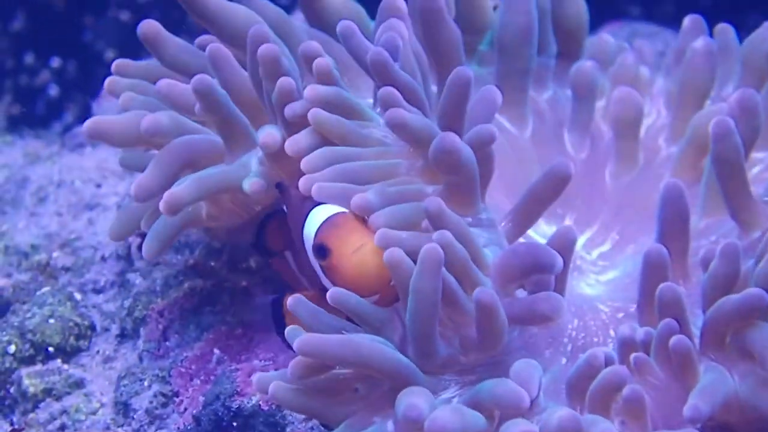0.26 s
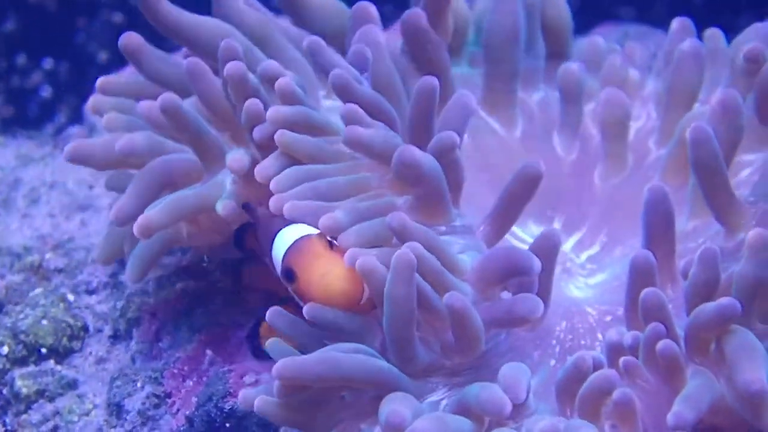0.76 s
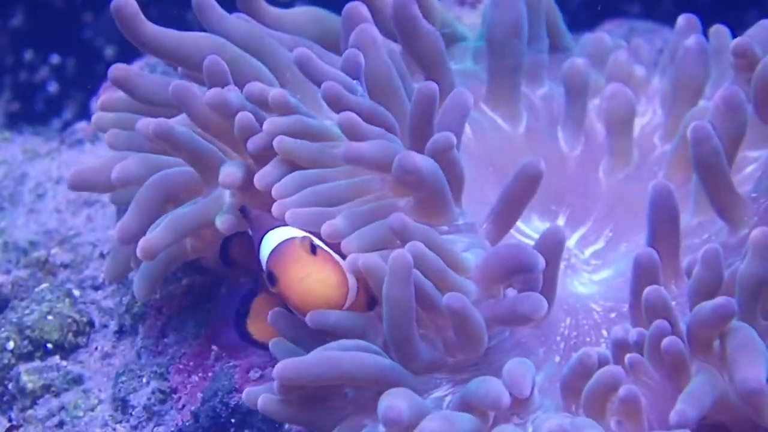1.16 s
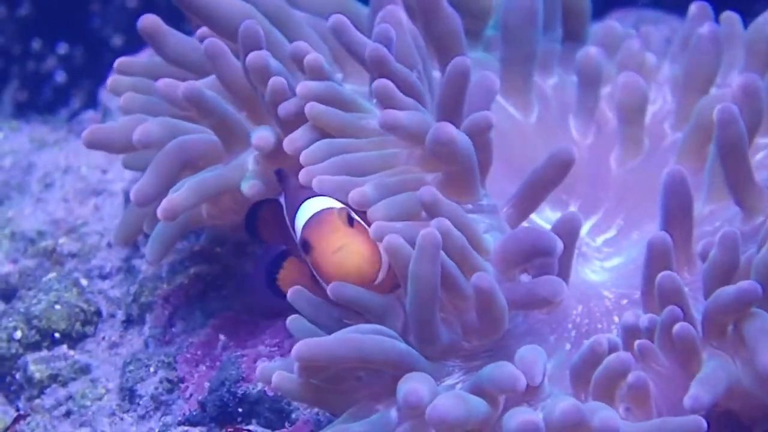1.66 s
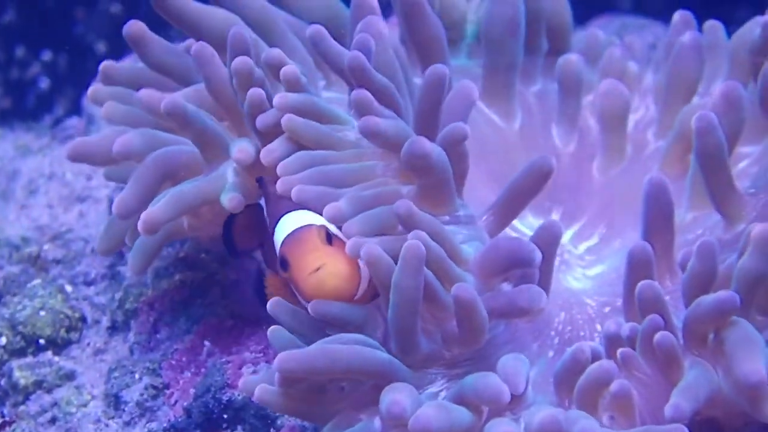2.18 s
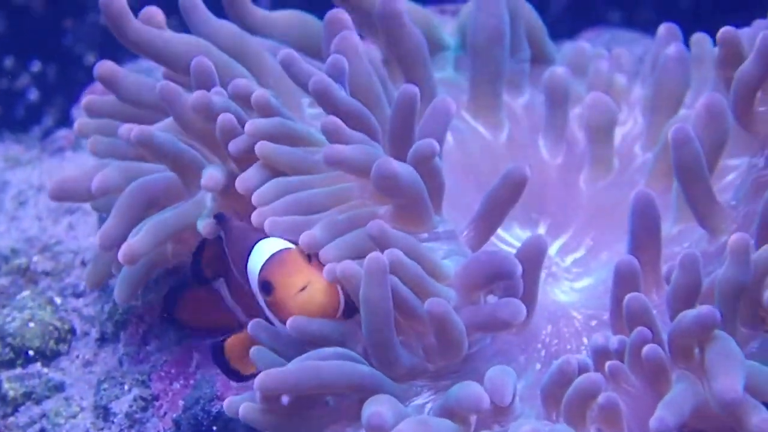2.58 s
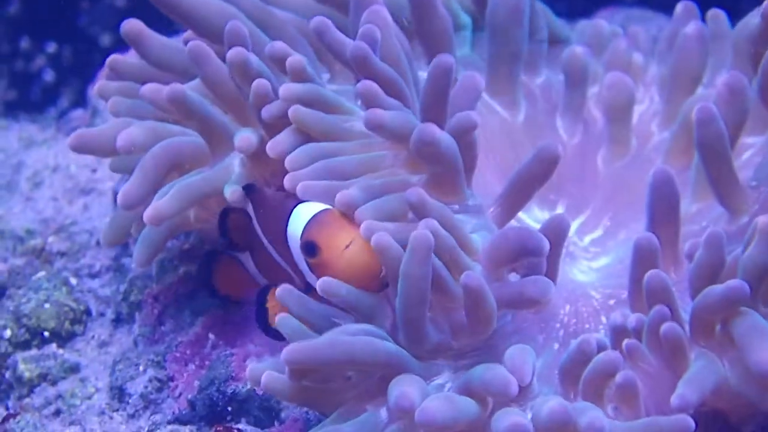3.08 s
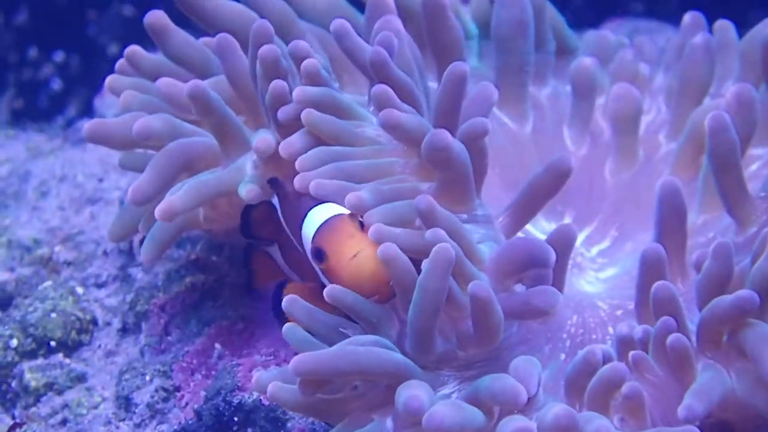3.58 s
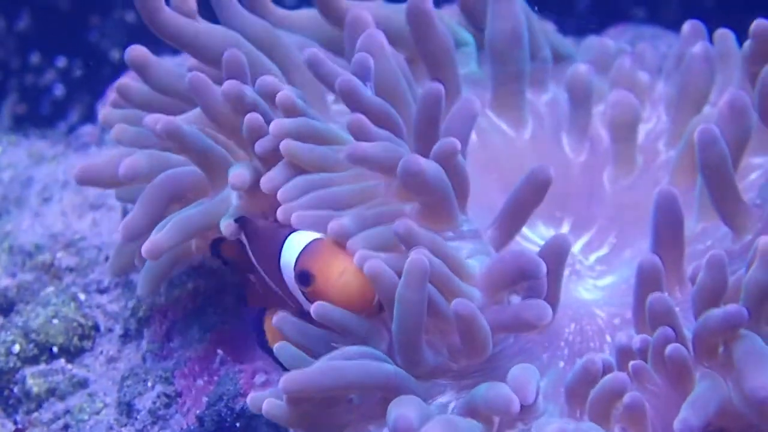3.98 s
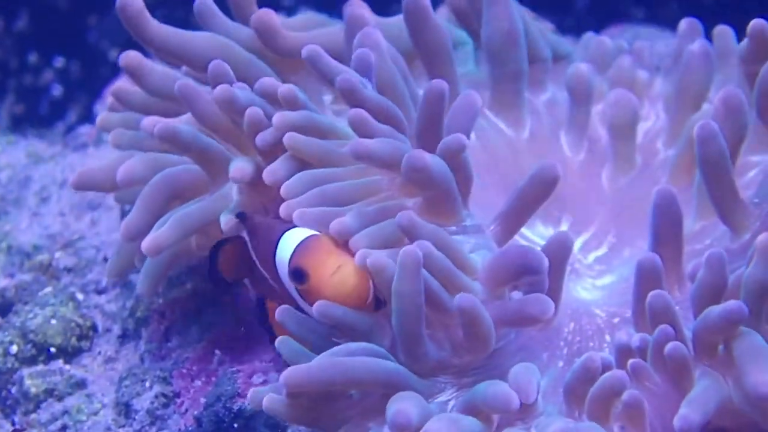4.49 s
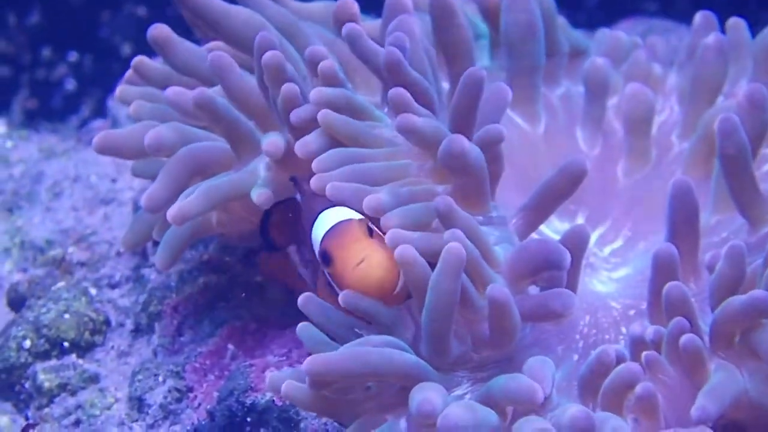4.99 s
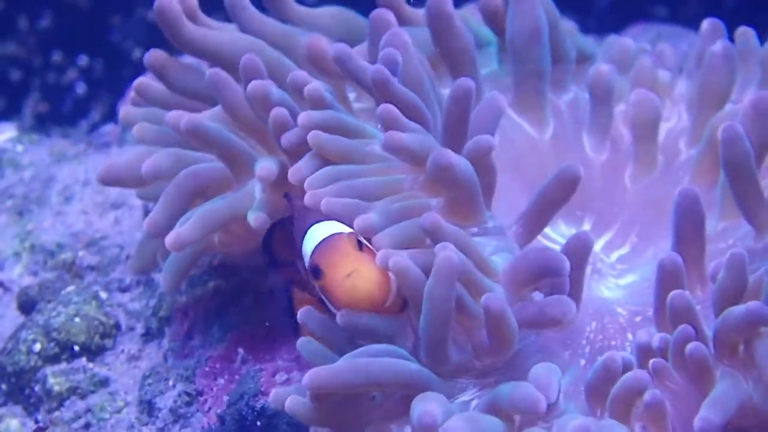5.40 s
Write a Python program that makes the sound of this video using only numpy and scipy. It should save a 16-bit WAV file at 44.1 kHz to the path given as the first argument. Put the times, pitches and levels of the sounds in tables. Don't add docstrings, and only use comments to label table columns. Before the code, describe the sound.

A fish tank heard close through a hand-held camera, with soft hiss. A low pump hum near 120 hertz starts close to full strength, glides down, and swells again around 2 and 4 seconds, each peak bringing muffled churning and short rising groans. Between them, from about 0.6, 2.2 and 3.7 seconds, a nearer pump spurts and hums more faintly. A steady filter purr, low rumble and water trickle run throughout; small bubbles blip and droplets tick. Until about 1.5 seconds the lens motor taps rapidly, some fifteen dull clicks a second, with a faint whine. Skin rubs and knocks, mostly on the left, cluster around 1.3 to 1.75, ending in a hard thump at 1.8. The middle is calmer, with a small snap at 2.8. The hum nearly vanishes at 4.2; a knock lands at 4.45, then rustling and bumps from 4.9 build to another hard thump at 5.6.

```python
import sys
import numpy as np
from scipy import signal
from scipy.fft import rfft, irfft, next_fast_len
from scipy.io import wavfile
from scipy.ndimage import uniform_filter1d

SR = 44100
rng = np.random.default_rng(int(sys.argv[2]) if len(sys.argv) > 2 else 0)


def unload_audio(sound):
    columns = np.transpose(np.atleast_2d(sound))
    steps = np.round(np.clip(columns, -1, 1) * 32767)
    wavfile.write(sys.argv[1], SR, steps.astype(np.int16))


def elevation(decibels):
    levels = np.asarray(decibels, float)
    return 10 ** (levels / 20)


N = 249165
EDGE = 4096
FULL = next_fast_len(N + 2 * EDGE)
TIME_S = np.arange(N) / SR
BIN_HZ = np.maximum(np.fft.rfftfreq(FULL, 1 / SR), 1)

# (time at full speed [s], hum level [dB], jet level [dB], churn level [dB])
FAR_SURGES = [
    (0.06, -35.5, -64.5, -41.5),
    (2.065, -34, -66, -30.5),
    (4.046, -34, -64.5, -33),
]
# (switch-on time [s], hum level [dB], jet level [dB])
NEAR_SURGES = [
    (0.6, -44.5, -55),
    (2.17, -43, -59.5),
    (3.741, -42, -56),
]
NEAR_PUSH_S = 0.793


def level(x, db):
    return x * elevation(db) / np.sqrt(np.mean(x ** 2))


def sides(pan_db):
    gain = elevation(np.array([pan_db, -pan_db]) / 2).reshape(2, -1)
    return gain / gain.mean(axis=0)


def on_log(table, hz):
    return np.interp(np.log(hz), np.log([r[0] for r in table]), [r[1] for r in table])


def peaks(table):
    power = 0
    for hz, width_hz, db in table:
        detune = (BIN_HZ - hz ** 2 / BIN_HZ) / width_hz
        power = power + elevation(2 * db) / (1 + detune ** 2) ** 2
    return np.sqrt(power)


def colour(x, gain):
    taper = signal.windows.tukey(N + 2 * EDGE, 2 * EDGE / (N + 2 * EDGE))
    longer = np.pad(x, [(0, 0), (EDGE, EDGE)], mode="reflect", reflect_type="odd") * taper
    return irfft(rfft(longer, FULL) * gain, FULL)[:, EDGE:EDGE + N]


def flicker(spread_db, rate_hz):
    step = 32
    k = int(SR / rate_hz / step)
    held = np.repeat(rng.standard_normal(N // step // k + 2), k)
    walk = 1.48 * uniform_filter1d(uniform_filter1d(held, k), k)
    return np.interp(np.arange(N), step * np.arange(len(walk)), elevation(spread_db * walk))


def swell(spans, fade_s, column=1):
    out = np.zeros(N)
    for span in spans:
        s, db = np.transpose(span)[[0, column]]
        to_end_s = np.minimum(TIME_S - s[0], s[-1] - TIME_S)
        out += elevation(np.interp(TIME_S, s, db)) * np.clip(to_end_s / fade_s + .5, 0, 1)
    return out


def glide(spans, multiples, wobble_db, fade_s):
    out = np.zeros(N)
    for span in spans:
        gain = np.sqrt(2) * swell([span], fade_s, column=2)
        on = gain > 0
        turn = 2 * np.pi * np.cumsum(np.interp(TIME_S[on], *np.transpose(span)[:2])) / SR
        for k, db in multiples:
            tone = np.sin(k * turn + 7 * rng.random())
            out[on] += gain[on] * elevation(db) * flicker(wobble_db, 16)[on] * tone
    return out


def wash(gain, likeness, flicker_db, rate_hz):
    like = np.clip(likeness, 0, 1)
    mid, side = (rfft(rng.standard_normal(FULL)) * gain * np.sqrt(1 + s * like) for s in (1, -1))
    both, out = np.array([mid + side, mid - side]), 0
    for octave in np.arange(4, 14.5, .5):
        band = np.cos(np.pi * np.clip(np.log2(BIN_HZ) - octave, -.5, .5)) ** 2
        if np.max(gain * band) > np.max(gain) / 400:
            out = out + flicker(flicker_db, rate_hz) * irfft(both * band, FULL)[:, :N]
    return level(out, 0)


def add(out, s, db, hz, ring_s, rise_s, pan_db, slide=0., lead=0., order=1):
    i = int(s * SR)
    t = np.arange(min(int(ring_s * SR), N - i)) / SR
    shape = (1 - np.exp(-t / rise_s)) ** 2 * elevation(-60 * (t / ring_s) ** order)
    turn = 2 * np.pi * hz * t * (1 + slide * t / ring_s) + np.array([[lead], [-lead]]) / 2
    out[:, i:i + len(t)] += elevation(db) * sides(pan_db) * np.sin(turn) * shape / shape.max()


def far_rotor():
    full_hz, climb_hz_per_s, fall_hz_per_s = 121, 86, 66
    # (hum frequency [Hz], level [dB])
    mount = [(89, -7.5), (98, -3.5), (106, -3.5), (114, -1.5), (121, -5.5)]
    since_s = np.linspace(-.39, 0.43, num=60)
    hz = full_hz - np.maximum(-climb_hz_per_s * since_s, fall_hz_per_s * since_s)
    return [np.transpose([s + since_s, hz, db + on_log(mount, hz)]) for s, db, _, _ in FAR_SURGES]


def near_rotor():
    return [[(s + 0.329, 112.2, db), (s + NEAR_PUSH_S + 0.049, 99.6, db + 0.5)] for s, db, _ in NEAR_SURGES]


def far_flow(levels_db, start_db, end_db):
    before_s, after_s = .66, 0.558
    spans = [[(r[0] - before_s, db + start_db), (r[0], db), (r[0] + after_s, db + end_db)]
             for r, db in zip(FAR_SURGES, levels_db)]
    return swell(spans, 0.023)


def filter_motor():
    # (frequency [Hz], level [dB])
    lines = [(280, -48.5), (620, -57.5), (1389, -69.5)]
    out = np.zeros(N)
    for hz, db in lines:
        turn = 2 * np.pi * np.cumsum(hz * flicker(.05, 4.5)) / SR
        out += elevation(db) * flicker(1.6, 13) * np.sin(turn)
    return out


def rotor_hum():
    # (multiple of the hum [1], level [dB])
    harmonics = [(.5, -18.5), (1, 5), (1.5, -14.5), (2, -10.5), (2.5, -14)]
    # (time [s], level [dB], width [s])
    falters = [
        (0.99, -8, 0.015),
        (1.84, -7, 0.013),
        (2.065, -9, 0.045),
        (2.37, -5, 0.015),
        (2.6, -6, 0.031),
        (4.035, -10, 0.02),
        (4.235, -24, 0.042),
        (4.47, -7, 0.01),
    ]
    falter_db = sum(db * np.exp(-((TIME_S - s) / width_s) ** 2) for s, db, width_s in falters)
    tones = glide(far_rotor() + near_rotor(), harmonics, wobble_db=1.73, fade_s=0.07005)
    return tones * elevation(falter_db) * sides(-.3)


def stand_ring():
    stand_hz, width_hz, lift_db = 167, 8.1, -6
    spans = []
    for span in far_rotor():
        ring = []
        for s, hz, db in span:
            loss_db = 6 * min(((1.5 * hz - stand_hz) / width_hz) ** 2, 6)
            ring.append((s, 1.7 * hz, db + lift_db - loss_db))
        spans.append(ring)
    return glide(spans, [(1, 0)], wobble_db=0.5, fade_s=.03)


def mount_groans():
    # (time [s], length [s], frequency [Hz], level [dB])
    groans = [(-0.03, 0.088, 346.4, -27), (0.084, 0.054, 346, -26), (0.16, 0.057, 354, -33),
              (0.208, 0.091, 332, -34), (0.315, 0.037, 347.5, -38.5), (0.385, 0.059, 369, -35),
              (1.91, 0.052, 326, -38), (1.965, 0.032, 329, -34.5), (1.997, 0.13, 354, -27.5),
              (2.151, 0.11, 336.3, -31.5), (2.265, 0.032, 368, -40.5), (2.328, 0.074, 358, -37),
              (2.41, 0.047, 374.5, -38), (2.478, 0.049, 388.5, -38.5), (2.84, 0.1, 365, -40.5),
              (3.609, 0.04, 407, -34), (3.653, 0.055, 372, -34.5), (3.802, 0.07, 352.6, -34),
              (3.889, 0.095, 328.3, -29.5), (3.999, 0.076, 357, -29), (4.1, 0.11, 336.7, -30.5),
              (4.196, 0.035, 313, -34), (4.267, 0.069, 358.5, -36)]
    rise_hz_per_s, edge_db = 157, -2
    spans = []
    for s, length_s, hz, db in groans:
        rise_hz = rise_hz_per_s * length_s
        spans.append([(s, hz, db + edge_db), (s + 0.57 * length_s, hz + 0.87 * rise_hz, db),
                      (s + length_s, hz + rise_hz, db + edge_db)])
    return glide(spans, [(1, -.1)], wobble_db=-1.34, fade_s=0.00917) * sides(-.8)


def filter_rumble():
    # (frequency [Hz], density [dB per Hz])
    spectrum = [(12, -66.5), (20, -25), (65, -2.5), (125, -10), (198, -10.5), (229, -14), (274, -8.5),
                (313, -8.5), (392, -8), (422, -7), (586, -12), (631, -21.5), (700, -51.5), (910, -66),
                (1540, -120)]
    # (frequency [Hz], left-right likeness [0-1])
    likeness = [(60, 1), (130, 0.82), (290, 0.98), (640, 0.95), (1410, 0.9), (3100, 0.5), (6820, 0.05),
                (15000, -0.01)]
    # (time [s], level [dB])
    weir_flow = [
        (0.0, 4),
        (1.6, 4),
        (1.84, -11),
        (2.2, -5.5),
        (2.6, 4.5),
        (3.6, -3),
        (4.07, 8.5),
        (4.8, 1),
        (5.65, 2.5),
    ]
    gain = elevation(on_log(spectrum, BIN_HZ))
    deep = 1 / (1 + (BIN_HZ / 85) ** 6)
    top = 1 / (1 + (493 / BIN_HZ) ** 8)
    stand = wash(gain * deep, 0.69, flicker_db=-0.5, rate_hz=3.4) * elevation(-46) * flicker(0.67, 2.3)
    weir_db = -48.5 + np.interp(TIME_S, *np.transpose(weir_flow))
    weir = wash(gain * top, 0.71, flicker_db=-1.5, rate_hz=14) * elevation(weir_db)
    far_on = far_flow(np.zeros(len(FAR_SURGES)), -4.0, -3)
    near_on = swell([[(s, 0), (s + NEAR_PUSH_S, 0)] for s, _, _ in NEAR_SURGES], 0.11)
    rumble = wash(gain * (1 - deep) * (1 - top), on_log(likeness, BIN_HZ), flicker_db=1.26, rate_hz=13)
    rumble *= elevation(-39.5 + 3 * far_on + 2 * near_on)
    return stand * sides(3.5) + (rumble + weir) * sides(0.6)


def overflow_trickle():
    # (frequency [Hz], density [dB per Hz])
    spectrum = [(380, -28.5), (640, -14.5), (682, -11), (1310, -19), (1410, -23), (1470, -22), (2300, -35),
                (2990, -76.5), (5060, -120)]
    # (time [s], level [dB])
    flow = [
        (0.0, 5.5),
        (1.7, -2.5),
        (1.86, -3.5),
        (2.5, -1),
        (3.3, -0.5),
        (3.6, 3.5),
        (5.65, -1),
    ]
    trickle = wash(elevation(on_log(spectrum, BIN_HZ)), 0.52, flicker_db=0.5, rate_hz=20)
    return trickle * elevation(-56 + np.interp(TIME_S, *np.transpose(flow))) * sides(-3.5)


def wall_churn():
    # (frequency [Hz], width [Hz], level [dB])
    walls = [(357, 65, 2), (464, 83, -9)]
    churn_db = [r[3] for r in FAR_SURGES]
    flow = elevation(-57) + far_flow(churn_db, -14.5, -6)
    return wash(peaks(walls), 1.0, flicker_db=-1.0, rate_hz=80) * elevation(-3.5) * flow * sides(-0.86)


def far_jet():
    # (frequency [Hz], width [Hz], level [dB])
    nozzle = [(1827, 470, 8.5), (2030, 570, -12), (880, 450, 10)]
    flow = far_flow([r[2] for r in FAR_SURGES], -8, -2.5)
    return wash(peaks(nozzle), 1.0, flicker_db=1.5, rate_hz=14) * flow * elevation(9.0) * sides(-4.5)


def lens_motor():
    # (time [s], peak level [dB], ring [s])
    steps = [(0.004, -24.5, 0.036), (0.069, -29, 0.046), (0.136, -24.5, .04), (0.2065, -15.5, 0.035),
             (0.275, -19, 0.039), (0.336, -29, 0.05), (0.402, -25, .035), (0.473, -18, 0.043),
             (0.535, -30.5, 0.053), (0.603, -30, 0.031), (0.669, -28, 0.082), (0.737, -28.5, 0.035),
             (0.803, -27, 0.035), (0.875, -23, 0.043), (0.936, -26.5, 0.026), (1.003, -26, 0.072),
             (1.069, -27.5, .04), (1.136, -27.5, 0.053), (1.204, -24, 0.069), (1.268, -31.5, 0.044),
             (1.336, -33, .04), (1.403, -30, .04), (1.473, -25.5, 0.025)]
    # (step level [dB], frequency [Hz])
    barrel = [(-35, 570), (-30.5, 606), (-17, 633)]
    # (frequency [Hz], level [dB])
    whine = [(3192, -78), (6385, -59)]
    whine_start_s, whine_every_s, whine_length_s = 0.0024, 1 / 15, 0.016
    out = np.zeros((2, N))
    for (s, db, ring_s), chance in zip(steps, rng.standard_normal((len(steps), 3))):
        hz = np.interp(db, *np.transpose(barrel)) * (1 + 0.015 * chance[0])
        add(out, s - .0012, db - 6.5, hz, .016, .0016, .5, lead=0.2, order=2)
        add(out, s - .0012, db - 5.5, hz, 1.2 * ring_s, .0013, .5, lead=0.2)
        add(out, s - .001, db - 26, 1350, .008, .0007, .5)
        upper_hz = (1.25 + 0.04 * chance[2]) * hz
        add(out, s - .0012, db - 12 + 2.5 * chance[1], upper_hz, .014, .0008, .5, lead=0.28)
    rattle = level(colour(rng.standard_normal((2, N)), peaks([(692, 330, 0.5)]) ** 2), -16)
    out += rattle * swell([[(s, db), (s + 0.02, db - 15.0)] for s, db, _ in steps], 0.0044)
    gate = (TIME_S - whine_start_s) % whine_every_s < whine_length_s
    gate = gate & (TIME_S < steps[-1][0] + .03)
    since_s = (TIME_S - whine_start_s + .01) % whine_every_s
    tones = sum(elevation(db) * np.sin(2 * np.pi * hz * since_s) for hz, db in whine)
    return out + uniform_filter1d(1. * gate, size=130) * flicker(0.95, 11.8) * tones


def droplets():
    # (time [s], peak level [dB], frequency [Hz])
    ticks = [(0.357, -45, 8800), (0.5428, -40, 6540), (0.5847, -47, 6660), (0.6535, -47, 5850),
             (1.294, -38.5, 6600), (1.3347, -44, 6400), (1.3573, -41, 5800), (1.3645, -44, 6300),
             (1.37, -37.5, 6600), (1.38, -46, 6440), (2.106, -52, 8670), (2.2313, -43, 6260),
             (2.442, -47, 6700), (2.4892, -44, 5730), (2.537, -34.5, 6000), (2.5377, -41, 8600),
             (2.563, -39.5, 5830), (2.708, -48.5, 5370), (2.7627, -43, 8000), (2.9398, -38, 5570),
             (2.9405, -38, 9100), (2.9537, -42, 6300), (2.9605, -44, 6400), (3.273, -48, 8100),
             (3.7549, -44.5, 6570), (3.813, -40.5, 6330), (4.432, -43.5, 6700), (4.473, -49, 8590),
             (5.3567, -46, 6605), (5.4151, -44.5, 6440)]
    out = np.zeros((2, N))
    for (s, db, hz), pan_db in zip(ticks, -3 + 4.3 * rng.standard_normal(len(ticks))):
        add(out, s, db, hz, .0035, .0001, pan_db, lead=0.087)
        add(out, s, db, min(1.2 * hz, 9300), .003, .0001, pan_db, lead=0.82)
    return out


def grip_knocks():
    # (time [s], peak level [dB], frequency [Hz], left minus right [dB])
    knocks = [(0.557, -19.5, 471, 12), (0.562, -14, 358, 8), (1.32, -21.5, 348, 4), (1.472, -46, 422, 1),
              (1.544, -20, 417, 15), (1.581, -21, 574, 12), (1.5898, -8.5, 437, 31),
              (1.602, -13.5, 464, 27), (1.612, -11, 360, 26), (1.621, -16.5, 265, 12),
              (1.641, -23, 600, 20), (1.644, -15, 235, 9), (1.651, -24, 257, 8), (4.448, -11.5, 329, 3.5),
              (4.873, -29, 506, 15), (4.955, -19.5, 530, -19), (5.059, -26, 493, 15),
              (5.344, -19.5, 459, 15), (5.354, -18, 406, 8), (5.374, -14.5, 554, 14), (5.424, -18, 250, 13),
              (5.429, -23.5, 520, 3), (5.44, -18, 478, 9), (5.482, -23.5, 306, -9), (5.509, -21.5, 473, 7),
              (5.533, -18, 397, 2), (5.549, -16.5, 358, -12), (5.578, -12.5, 453, -33),
              (.39, -30, 610, 2), (.428, -27, 600, 4), (1.366, -26, 580, -13), (1.389, -30, 400, 6),
              (1.402, -31, 330, -3), (1.415, -29, 560, 2), (1.507, -28, 550, 9), (1.533, -26, 690, 18),
              (1.662, -19.5, 382, 1), (1.675, -28, 420, 7), (1.695, -23.5, 458, -4), (1.707, -24, 420, 1),
              (1.729, -33, 425, 10), (1.743, -23.5, 388, 0), (4.978, -27, 350, -12), (5.02, -29, 296, 1),
              (5.094, -29, 439, -2), (5.19, -28, 355, 2), (5.26, -30, 275, 1), (4.939, -32, 560, -2),
              (4.995, -32, 696, -2), (5.003, -28, 600, -9), (5.007, -29.5, 220, -12), (5.074, -34, 300, -3),
              (5.106, -31, 560, 0), (5.124, -28, 300, -1), (5.345, -26, 160, 8), (5.372, -19, 170, 13),
              (5.392, -27, 500, 14), (5.433, -19, 330, 4), (5.44, -19.5, 130, 0), (5.451, -25, 230, -4),
              (5.458, -25, 480, -9), (5.462, -32, 270, -1), (5.473, -26, 220, -1), (5.502, -25, 240, -1),
              (5.524, -29, 600, 4), (5.541, -28, 380, -5), (5.561, -27, 450, 0), (5.568, -29, 450, -5),
              (5.586, -19, 300, -10), (5.605, -26, 480, 2)]
    both = knocks
    out = np.zeros((2, N))
    for (s, db, hz, pan_db), chance in zip(both, rng.random((len(both), 2))):
        ring_s = 0.0044 + 2.56 / hz
        lead = .5 + 0.56 * chance[0]
        add(out, s + 0.0015, db - 19.0, 0.894 * hz, 4.0 * ring_s, .0021, pan_db, lead=1.0)
        add(out, s + 0.00059, db - 0.5, 1.067 * hz, ring_s, .0016, pan_db, slide=-0.098, lead=lead, order=2)
        add(out, s + 0.002136, db - 13.0, 1.765 * hz, ring_s * 1.1, .0006, pan_db, lead=4.0 * chance[1])
    return out


def near_jet():
    # (frequency [Hz], width [Hz], level [dB])
    nozzle = [(798, 180, 6.5), (1428, 254, -1.5), (1696, 250, -7.5), (1174, 180, -7.5), (6330, 1150, -21.5)]
    spurts = [[(s, db + 2.5), (s + 0.049, db - 6), (s + 0.18, db), (s + 0.25, db + .6),
               (s + NEAR_PUSH_S, db - 2.5)] for s, _, db in NEAR_SURGES]
    jet = wash(peaks(nozzle), 1.0, flicker_db=-0.04, rate_hz=27)
    return jet * swell(spurts, 0.011) * elevation(9.5) * sides(-3.5)


def case_snaps():
    # (time [s], peak level [dB], frequency [Hz], left minus right [dB])
    snaps = [
        (0.8964, -59, 3502, 10),
        (2.7978, -31, 2870, 4),
    ]
    # (time [s], peak level [dB], frequency [Hz], left minus right [dB])
    plops = [
        (2.5365, -40, 1400, -4),
        (2.5595, -39, 1350, -4),
    ]
    out = np.zeros((2, N))
    for s, db, hz, pan_db in snaps:
        cycles = 0.5 + 12 * (db < -55)
        add(out, s, db, hz, cycles / hz, 0.5 / hz, pan_db)
    for s, db, hz, pan_db in plops:
        add(out, s, db, hz, .006, .0007, pan_db)
    return out


def bubbles():
    # (time [s], peak level [dB], frequency [Hz], left minus right [dB])
    pops = [(0.9494, -39.5, 1410, 0), (1.355, -27.5, 912, -1), (1.9884, -45, 1886, -2),
            (2.02, -41, 850, -16), (2.175, -48, 895, -4), (2.192, -44, 1386, -4), (2.23, -38, 847, -6),
            (2.559, -37, 823, -5.5), (2.773, -40, 800, -6), (2.844, -41, 800, -4), (3.387, -51, 1120, -4),
            (3.562, -52, 1050, -5.5), (3.731, -50, 764, -7), (3.909, -45, 920, -6.5), (4.054, -47, 790, -5),
            (4.219, -42, 791, -9), (4.727, -46, 1000, -4), (3.443, -38, 834, -5), (3.754, -42, 823, -6),
            (3.864, -37.5, 795, -8), (4.184, -34.5, 828, -1), (4.747, -39, 880, -4.5)]
    out = np.zeros((2, N))
    for s, db, hz, pan_db in pops:
        add(out, s, db, hz, .03, .0022, pan_db, slide=0.021, lead=0.3)
    return out


def skin_rubs():
    # (time [s], length [s], level [dB], left minus right [dB])
    rubs = [(1.334, 0.082, -33, -4), (1.386, 0.156, -38.5, 8), (1.525, 0.098, -33, 22),
            (1.639, 0.07, -38, 8), (1.73, 0.078, -37, 1), (4.928, 0.18, -38, -1.5), (5.344, 0.057, -30, 20),
            (5.424, 0.047, -26.5, -12), (5.475, 0.083, -28.5, -4), (5.566, 0.042, -25, -11),
            (5.607, .05, -38, -1)]
    # (frequency [Hz], density [dB per Hz])
    spectrum = [(100, -4), (250, -2), (500, -1.5), (800, -7.5), (1200, -24.5), (2000, -33), (2600, -67)]
    rustle = wash(elevation(on_log(spectrum, BIN_HZ)), 0.14, flicker_db=0.5, rate_hz=76)
    rustle = rustle * flicker(1.35, 120) * elevation(-1.0)
    return sum(rustle * swell([[(s, db), (s + length_s, db)]], 0.0078) * sides(pan_db)
               for s, length_s, db, pan_db in rubs)


def froth():
    # (time [s], length [s], level [dB])
    bursts = [
        (1.358, 0.036, -56.5),
        (2.942, .016, -62),
    ]
    gain = peaks([(6300, 2500, 10.0), (8600, 1500, -12)])
    crackle = colour(rng.standard_normal((2, N)), gain) * flicker(4.2, 400)
    spans = [[(s, db), (s + length_s, db - 0.5)] for s, length_s, db in bursts]
    return level(crackle, 0) * swell(spans, 0.0055)


def knock_cracks():
    # (time [s], level [dB], left minus right [dB])
    cracks = [
        (1.587, -51.5, 32),
        (5.375, -63.5, 16),
    ]
    out = np.zeros((2, N))
    for s, db, pan_db in cracks:
        add(out, s + 0.00451, db + 13.5, 2400, .0015, .0001, pan_db)
        add(out, s + 0.0033, db + 13, 1480, .025, .0005, pan_db)
    return out


def grip_slams():
    # (time [s], peak level [dB], frequency [Hz], left minus right [dB], crack level [dB])
    slams = [
        (1.8145, -4, 461, -3.5, -28.5),
        (5.5956, -4, 458, -10, -41.5),
    ]
    # (frequency [Hz], density [dB per Hz])
    spectrum = [(900, -3), (1500, 11), (2200, -11), (4000, -19), (5200, -18), (6500, -45.5)]
    out = np.zeros((2, N))
    for s, db, hz, pan_db, _ in slams:
        add(out, s, db, hz, .0071, .00046, pan_db, slide=-.145, lead=0.75, order=6)
        add(out, s + 0.0025, db - 30, 1.1 * hz, .03, .002, pan_db, lead=0.55)
        add(out, s + 0.0012, db - 38, 1480, .02, .0005, pan_db)
        add(out, s + 0.001008, db - 29, 2700, .0013, .0001, pan_db)
        add(out, s + 0.00036, db - 18, 1250, .004, .0004, pan_db)
    crack = level(colour(rng.standard_normal((2, N)), elevation(on_log(spectrum, BIN_HZ))), 0)
    return out + crack * swell([[(s, db), (s + 0.0023, db - 7.5)] for s, *_, db in slams], 0.00034)


def scene():
    # (frequency [Hz], level [dB])
    housing = [(2200, -0.5), (2450, -9.5), (4400, -27), (4800, 6)]
    late = np.exp(-2j * np.pi * BIN_HZ * np.array([[0], [2]]) / SR)
    pumps = rotor_hum() + stand_ring() + mount_groans() + wall_churn() + far_jet() + near_jet()
    water = filter_motor() + filter_rumble() + overflow_trickle()
    surface = droplets() + bubbles() + froth()
    tank = colour(pumps + water + surface, elevation(on_log(housing, BIN_HZ)) * late)
    pulls = grip_knocks() + case_snaps() + knock_cracks() + grip_slams()
    return tank + lens_motor() + skin_rubs() - pulls


def roll_off(x):
    return signal.sosfilt(signal.butter(12, 16470, fs=SR, output="sos"), x)


def record(dry):
    # (frequency [Hz], density [dB per Hz])
    hiss_spectrum = [(2530, -45.5), (4300, -33.5), (4820, -14.5), (5230, -8), (5860, -2), (6780, 2),
                     (7430, -4), (8890, 4), (9380, 0.5), (10700, -11), (15000, -9), (15700, -13)]
    ceiling, circuit_db, top_hz = 0.87, -72.5, 15790
    hiss = colour(rng.standard_normal((2, N)), elevation(on_log(hiss_spectrum, BIN_HZ)))
    hiss = level(hiss - .02 * hiss[::-1], -53.5) * sides(-1.1)
    circuit = elevation(circuit_db) * rng.standard_normal((2, N))
    total = ceiling * np.tanh(dry / ceiling) + hiss + circuit
    fade_in = np.minimum(TIME_S * 1000, 1)
    return roll_off(colour(total, BIN_HZ < top_hz) * fade_in)


dry = scene()
out = record(dry)
unload_audio(out)
```